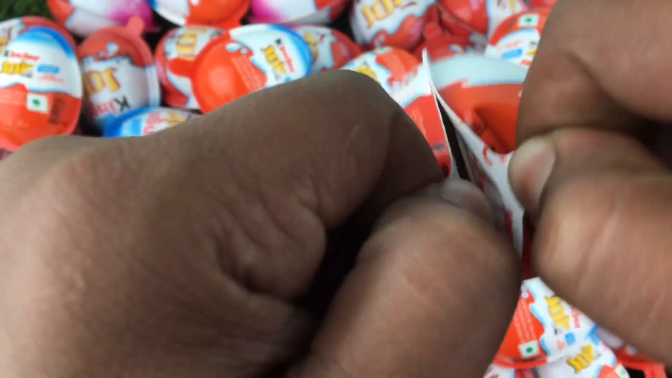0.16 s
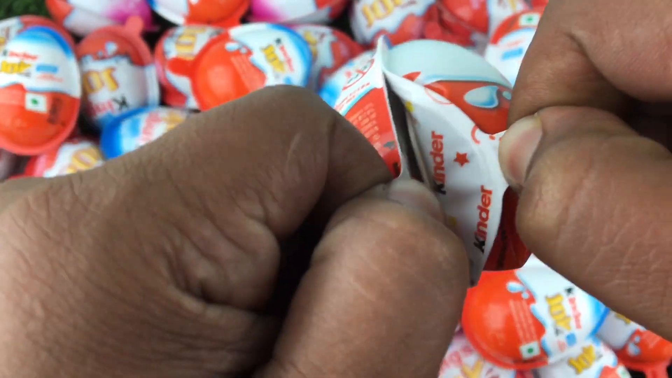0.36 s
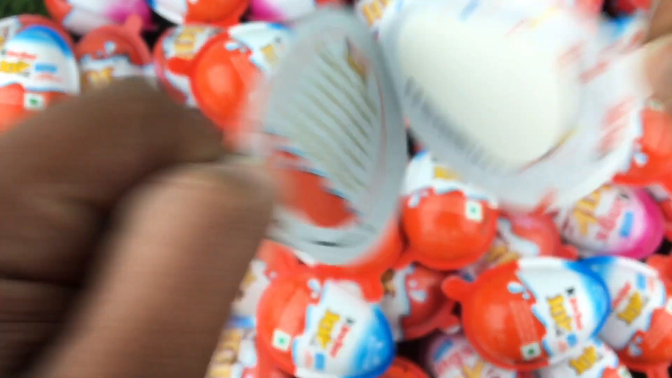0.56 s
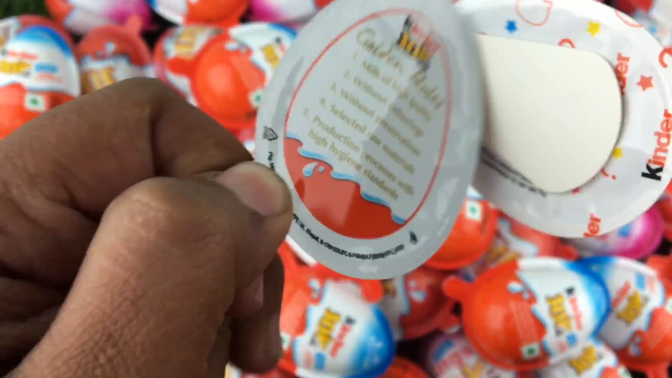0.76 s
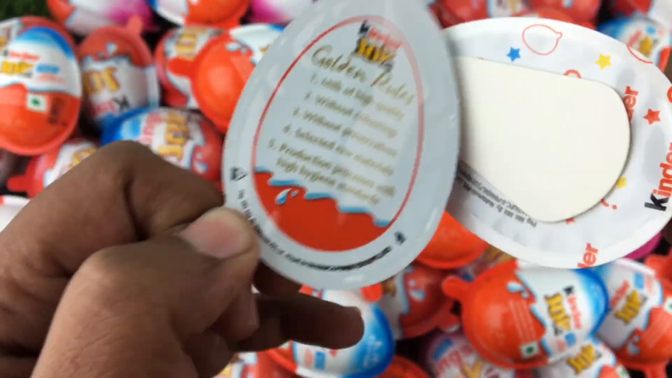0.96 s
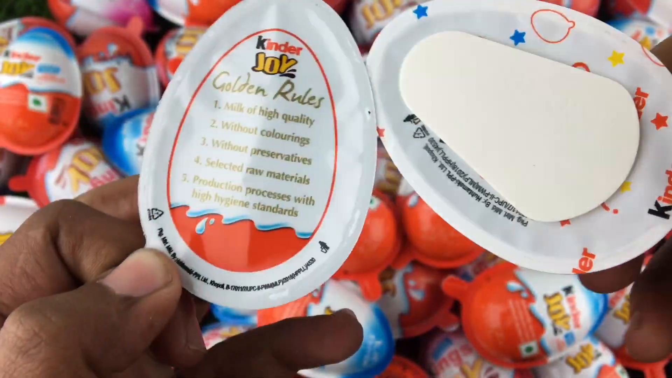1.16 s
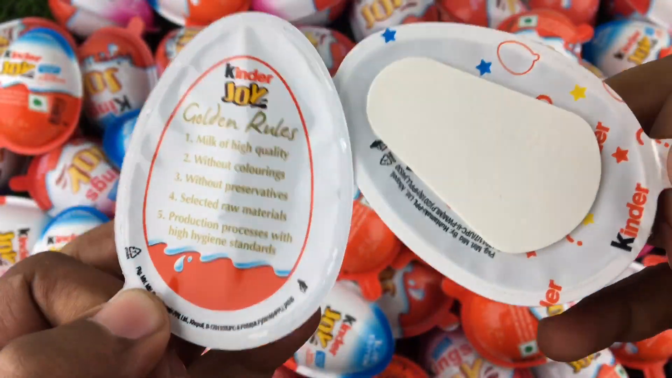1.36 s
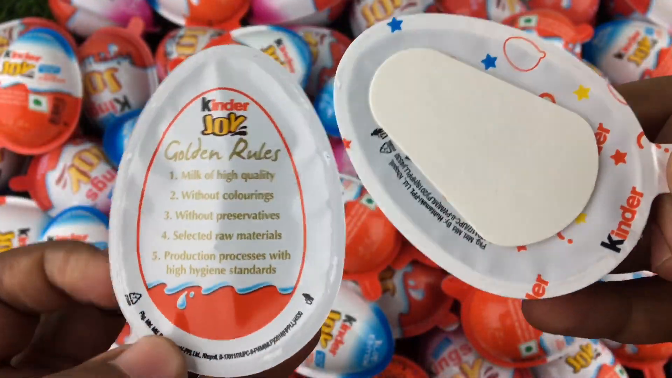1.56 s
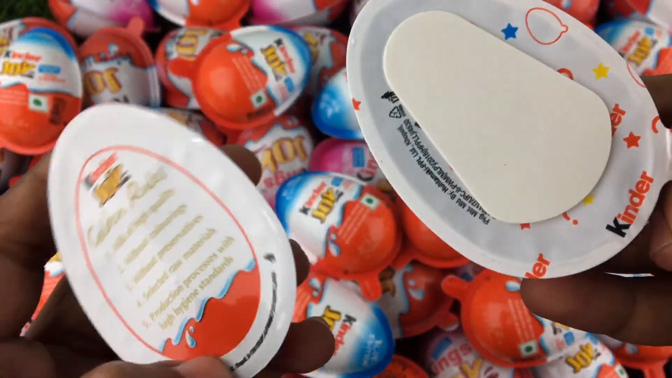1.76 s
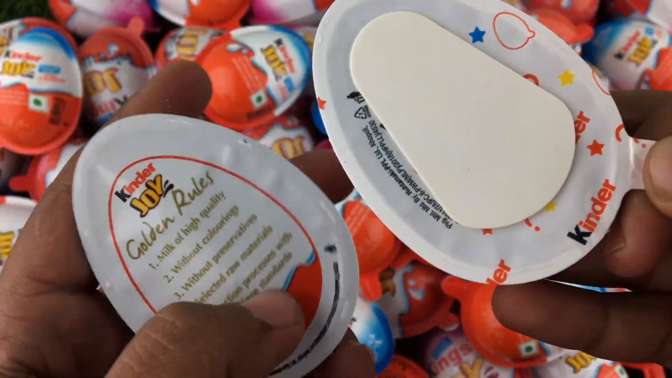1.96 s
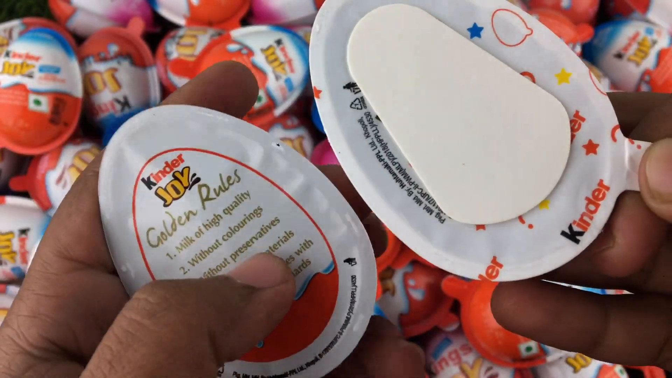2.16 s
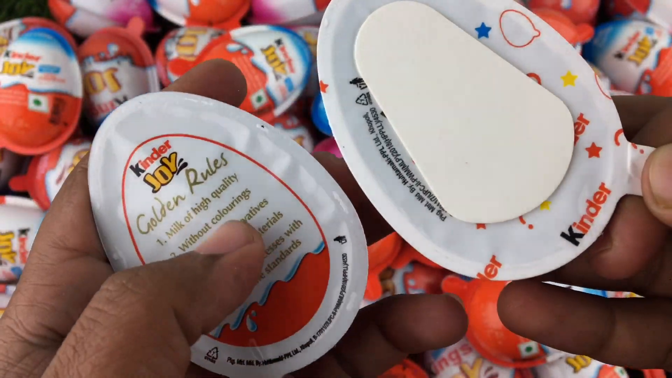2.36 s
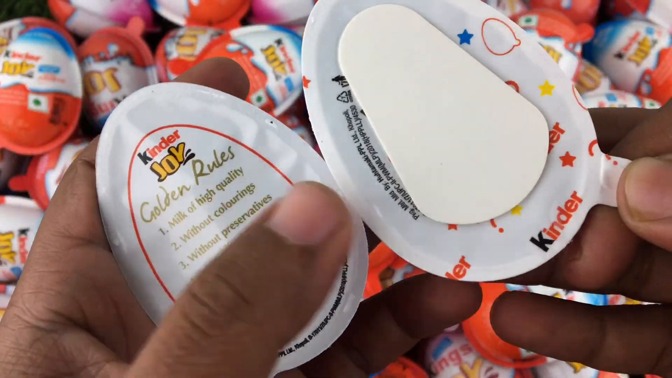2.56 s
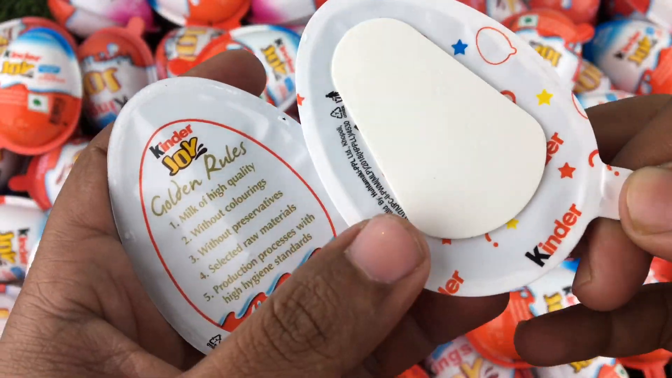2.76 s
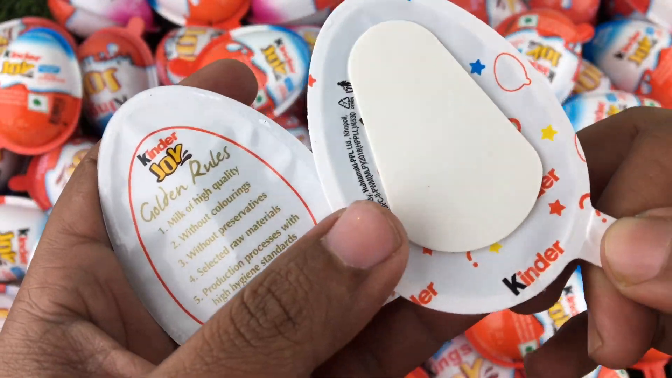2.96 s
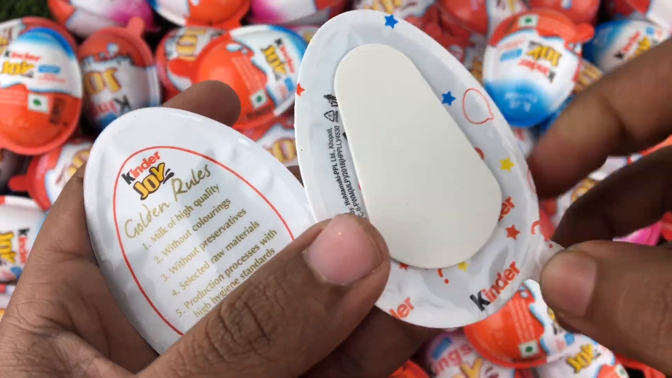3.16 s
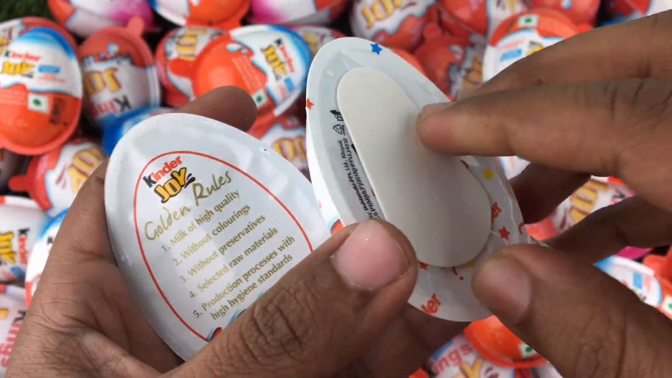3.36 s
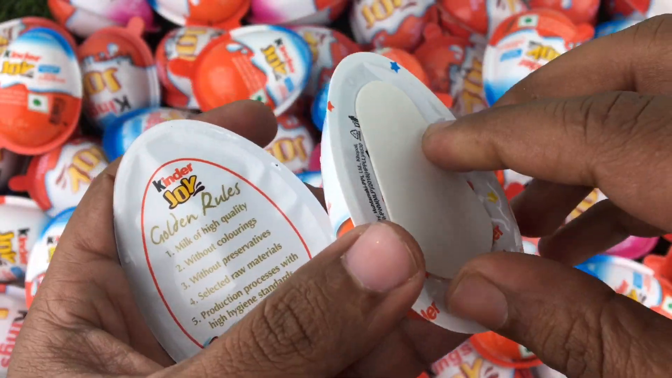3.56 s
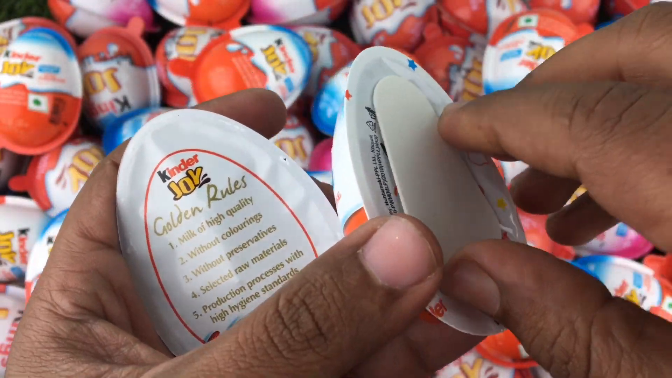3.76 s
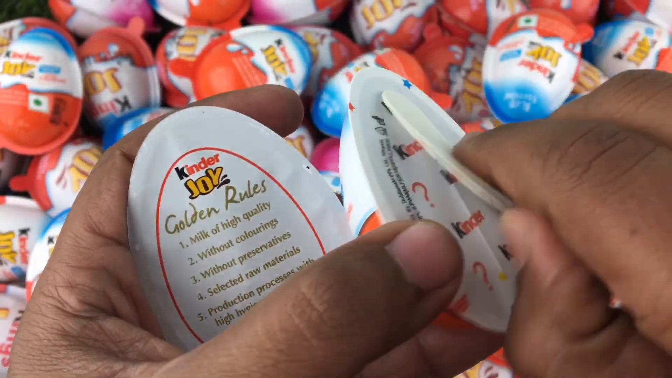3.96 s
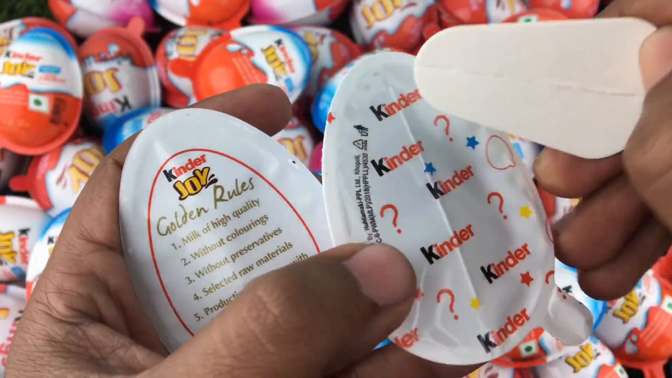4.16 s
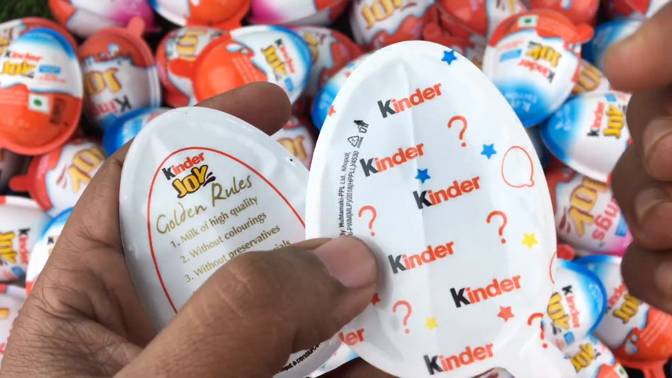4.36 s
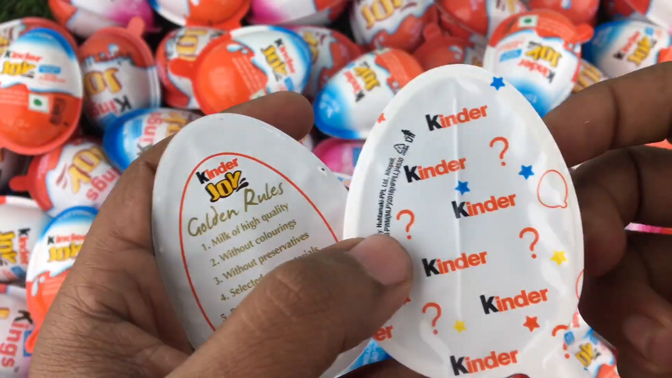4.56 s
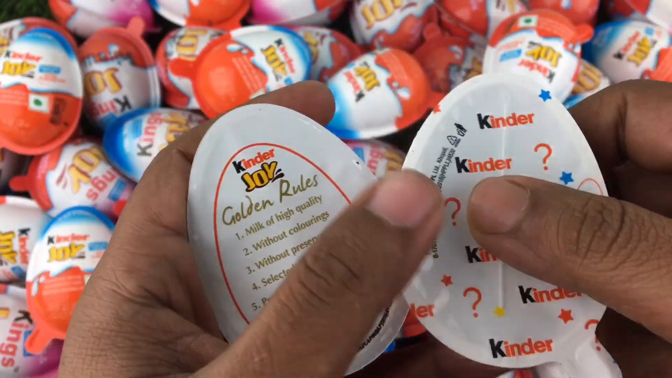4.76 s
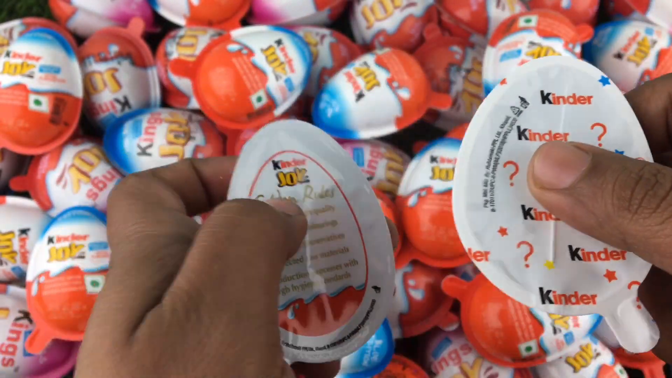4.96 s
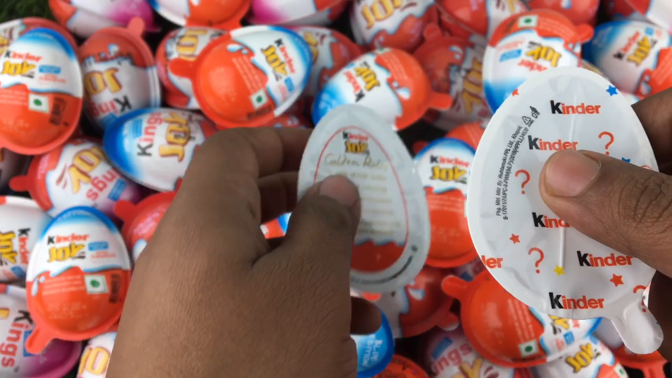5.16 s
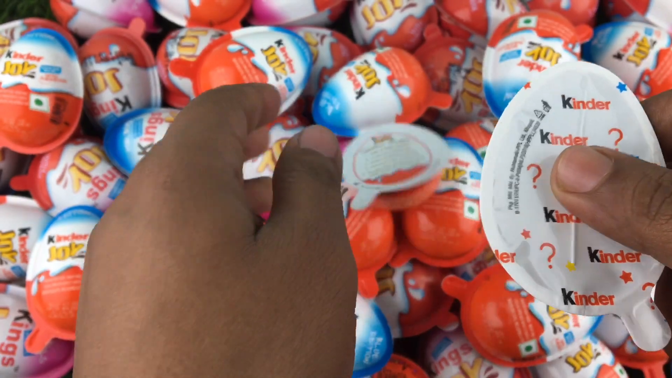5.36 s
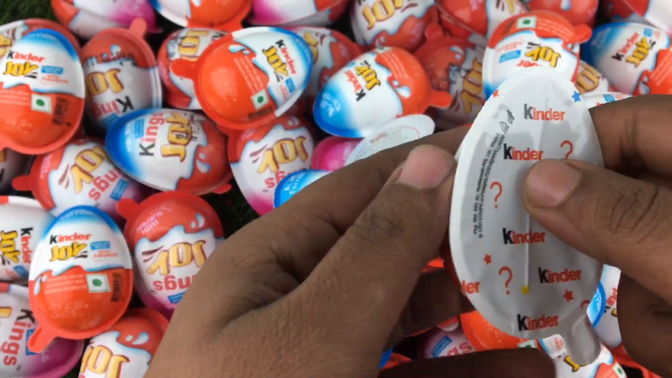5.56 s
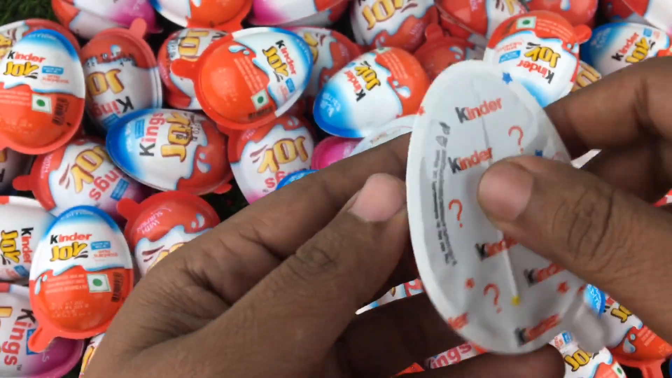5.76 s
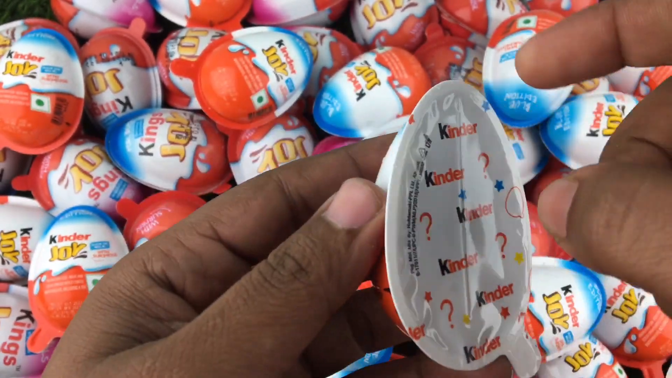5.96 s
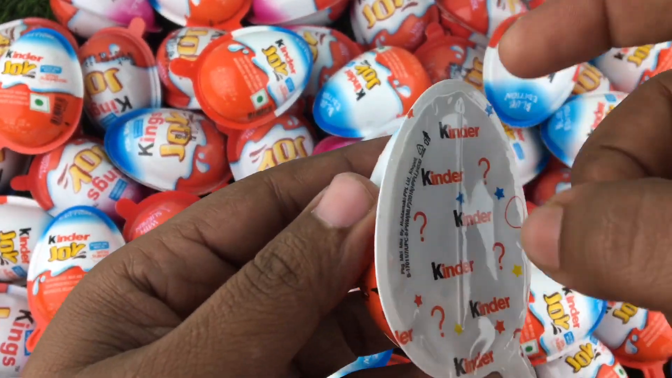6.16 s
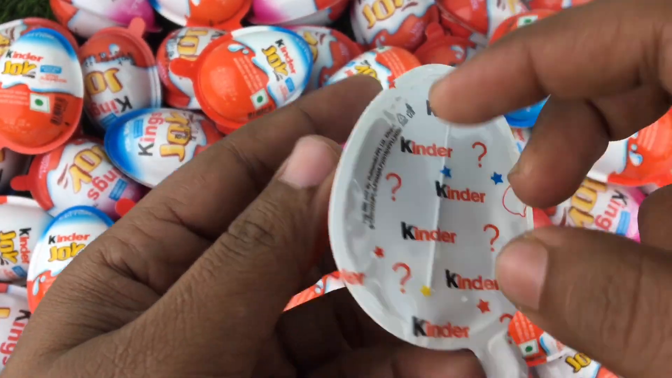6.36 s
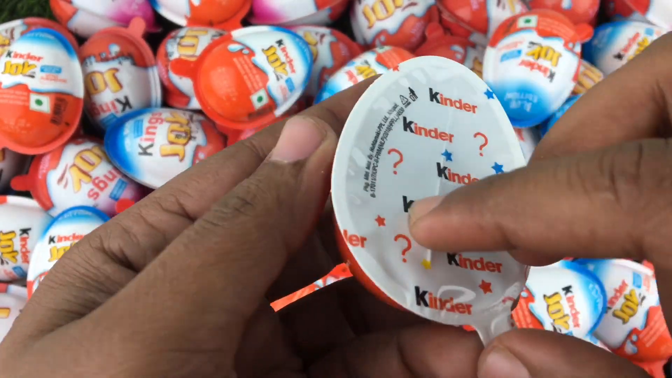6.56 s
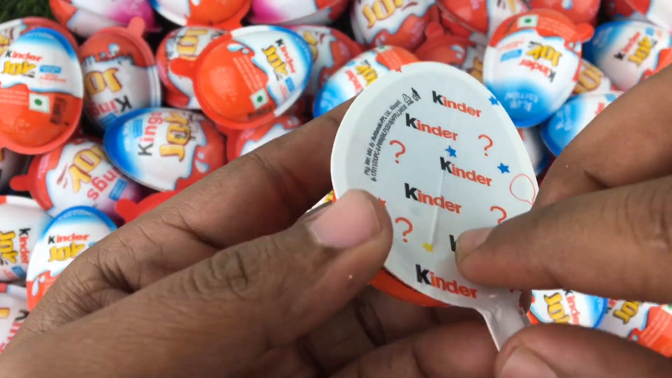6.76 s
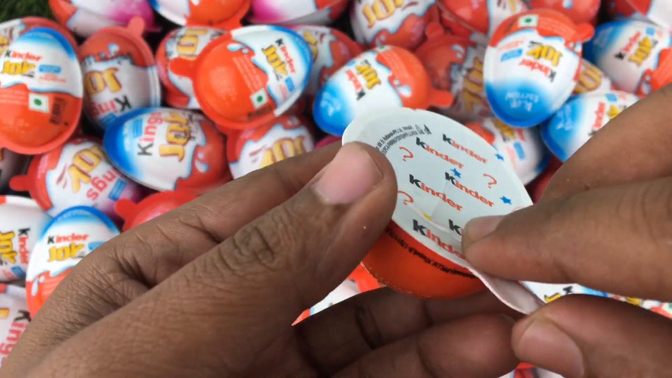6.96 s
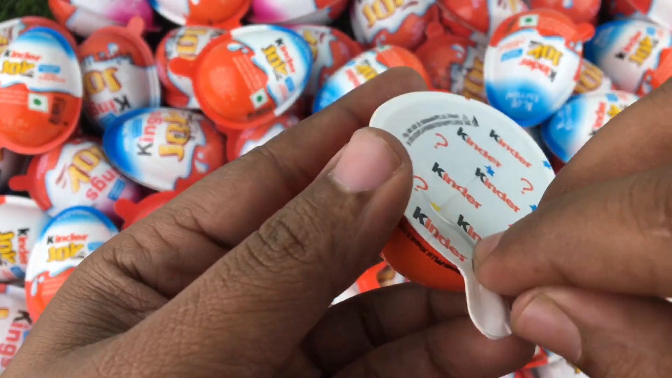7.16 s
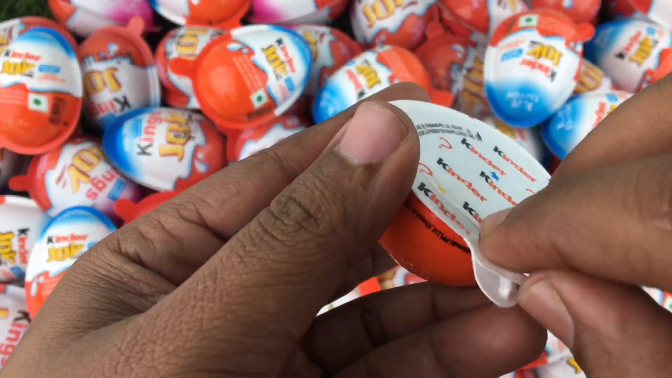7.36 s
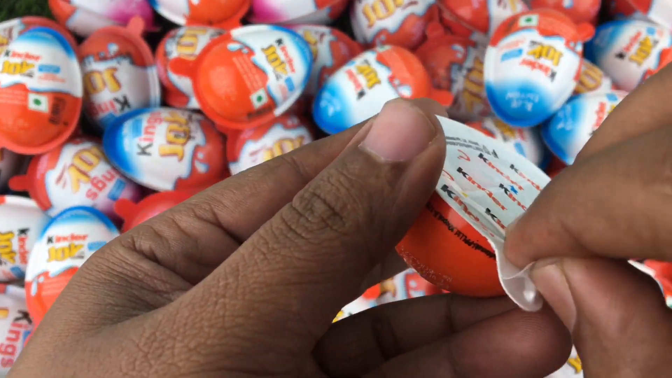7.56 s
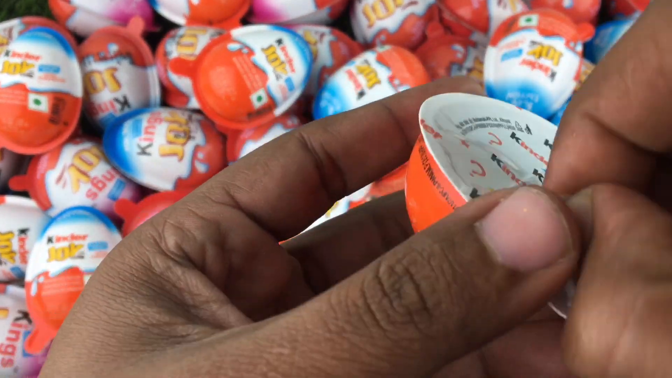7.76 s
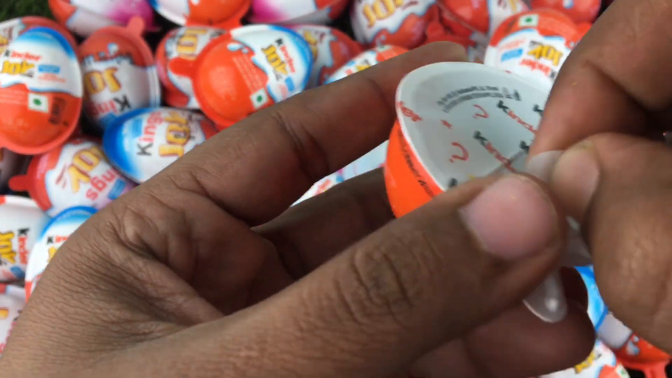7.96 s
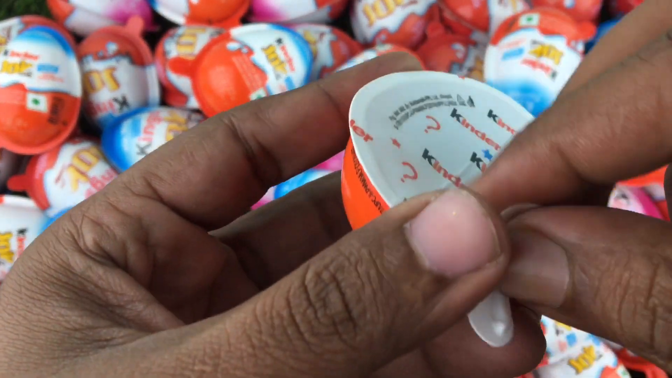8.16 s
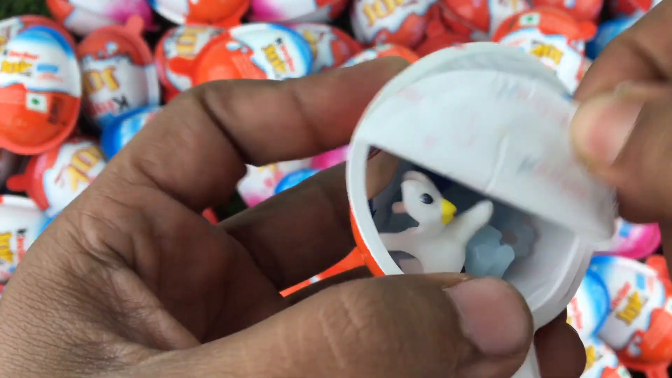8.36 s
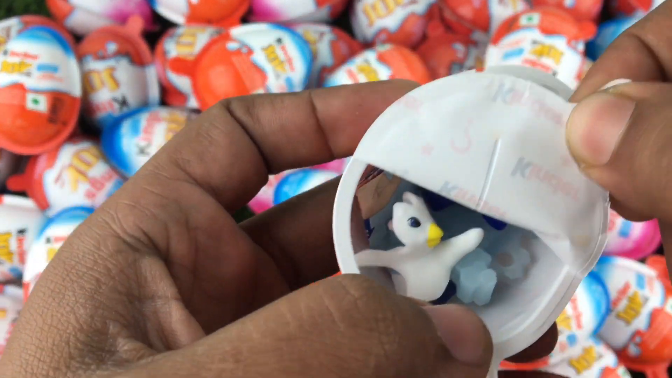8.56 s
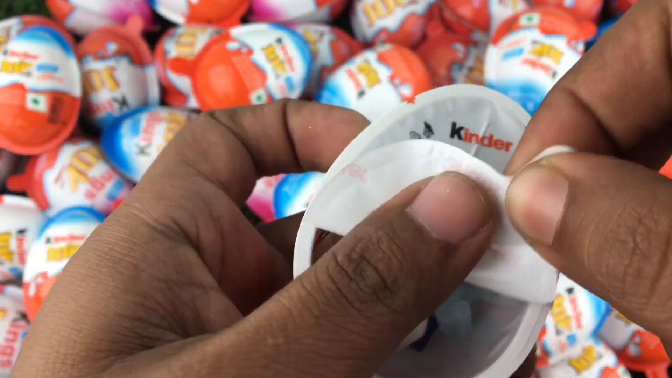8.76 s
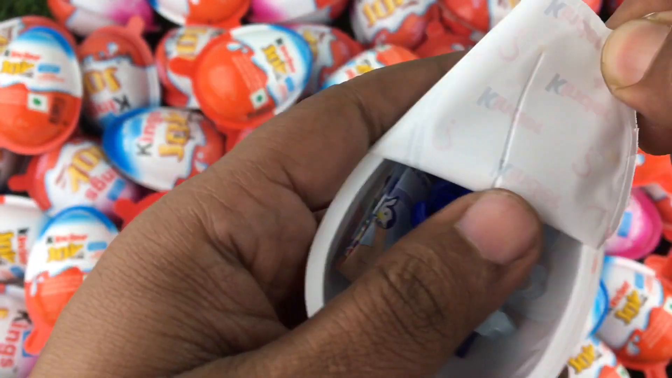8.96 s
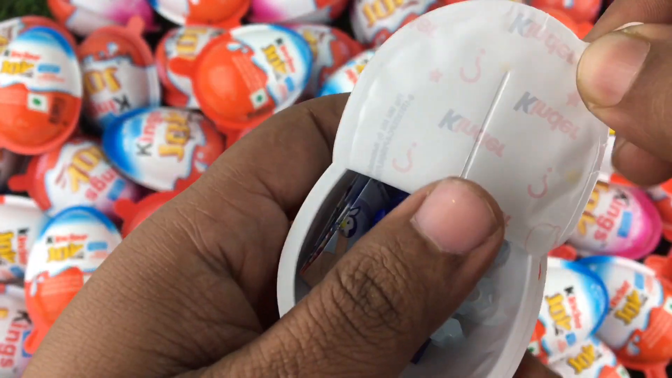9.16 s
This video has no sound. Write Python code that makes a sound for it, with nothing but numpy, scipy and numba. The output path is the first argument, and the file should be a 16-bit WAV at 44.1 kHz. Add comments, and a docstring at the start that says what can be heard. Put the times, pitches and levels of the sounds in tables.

```python
"""Sharp little cracks and a soft bump: fingers split a plastic egg, peel its foil seal and handle a flat spoon,
a hand's width from a phone microphone in a small quiet room. Each crease or glue spot that lets go is a short
ring, a knock and a crack; peeling is a dense run of them. Sliding skin hisses, bumps thud low, the held foil
ticks and rustles. The room answers, and the loudest peaks overload the phone."""
import sys
import numpy as np
from scipy import signal
from scipy.fft import rfft, irfft
from scipy.io import wavfile
from scipy.ndimage import uniform_filter1d
from numba import njit

SR = 44100
rng = np.random.default_rng(int(sys.argv[2]) if len(sys.argv) > 2 else 0)


def generate_wav(signal):
    """Clip the signal to [-1, 1] and save it as 16-bit WAV at the path in sys.argv[1]."""
    frames = np.transpose(np.atleast_2d(signal))
    scaled = np.clip(frames, -1, 1) * 32767
    pcm = np.round(scaled).astype(np.int16)
    wavfile.write(sys.argv[1], SR, pcm)


N = 407043

# Single creases letting go: start_s, level_db, pitch_hz, crack_db, knock_db (last two relative to level)
CREASES = [(0.062, -22, 1500, 2, -3.5), (0.082, -24.5, 1304, -16, 10.5), (0.1706, -16, 3250, -9, -1.5),
           (0.187, -13.5, 2220, -13.5, 4), (0.1932, -10.5, 1330, 4, 5.5), (.23, -21, 1160, 0, 0),
           (0.2363, -4, 2600, -11, 4.5), (0.2636, -15.5, 3700, 2, -10.5), (0.2804, -14, 3140, -4, 2.5),
           (0.306, -25, 6290, 3, -5.5), (.323, -10.5, 2920, 0.5, 1), (0.3582, 0.1, 3650, -1.5, -14.5),
           (0.4807, -17, 2380, 5.5, -5.5), (0.5153, -13.5, 8480, 2, -7), (.536, -15.5, 2280, 4, 5),
           (0.5529, 10, 3190, 5.5, 2.5), (0.588, -8.5, 1030, -3.5, -11.5), (0.6163, 0.5, 1950, 6, 3),
           (0.7158, -10, 1043, -12, -1.5), (.762, -10, 2260, -8, 11), (0.8246, -9.5, 3700, -14, -7),
           (0.862, -12, 3180, -7, 5.5), (1.018, -23.5, 1200, -16, 1), (1.0804, -28, 2690, -10, -1),
           (1.1063, -36.5, 2420, 3, 5), (1.15, -20.5, 4000, -1.5, 8), (1.318, -16.5, 2330, -17.5, -0.5),
           (1.3607, -10, 3240, -19, 6.5), (1.414, -36.5, 2435, -3, 14), (1.927, -38.5, 1496, -12, 0.5),
           (1.9714, -7.5, 6350, 0, -10.5), (1.986, -35, 2000, -15.5, 0), (2.122, -40.5, 2510, -11, -5),
           (2.328, -18, 2348, -11.5, 7.5), (2.9, -40.5, 792, -6.5, -1), (2.955, -45, 705, -10, -4.5),
           (3.161, -39.5, 704, -17.5, 0), (3.222, -44, 3480, -1, -12), (3.3683, -31.5, 1420, -8, 11.5),
           (3.6015, -33, 8010, 1, -2.5), (3.6128, -7.5, 3180, -6, -2), (3.847, -11.5, 2450, -26, 1.5),
           (3.8728, -8.5, 2530, -13, 0.5), (3.9008, -6, 1000, -17, -3.5), (3.9044, 2.5, 1120, -7.5, -4.5),
           (3.9126, -5, 1050, -20.5, 3.5), (3.923, -9.5, 1380, -30.5, -3), (3.9346, -20, 2498, 3.5, -4),
           (3.948, 5.5, 1390, -12, -7.5), (4.031, -12, 1400, -10.5, 5.5), (4.0482, -5.5, 1600, -8.5, -4),
           (4.066, -5, 1110, -17.5, 7), (4.1506, -14, 1130, -30.5, -5), (4.2453, -1.5, 1540, -8.5, 3),
           (4.5635, -16.5, 800, -13.5, -5), (4.634, -28.5, 1007, -6.5, -11.5),
           (4.73, -16.5, 1440, -11.5, 6.5), (4.8201, -13.5, 705, -26, -1.5), (4.954, -26.5, 2270, -2, 1.5),
           (5.241, -4, 1590, -40.5, -16.5), (5.324, -17.5, 2760, -5.5, 0), (5.397, -10.5, 5270, 0.5, 1),
           (5.5183, -20, 2100, -13.5, 3.5), (5.621, -11, 1400, -27.5, -14), (5.7763, -22.5, 1520, -6, 6.5),
           (5.7838, 1, 1680, -35, -8.5), (5.8422, 2, 1400, -27, -9.5), (5.855, -2, 1560, -32.5, -5.5),
           (6.034, -28, 2210, -5.5, -5), (6.0554, 5.5, 1550, 0.5, 3), (6.0855, 4.5, 1865, -15, -11.5),
           (6.2416, 6, 1690, -11.5, 2.5), (6.2451, 6, 1500, -4.5, 1.5), (6.277, -6, 1830, -23.5, -6.5),
           (6.2843, 2.5, 1680, -15.5, -4), (6.2885, -6, 1196, -23, -6), (7.002, -35.5, 2204, -2.5, 7),
           (7.0451, -21, 2040, 1, 5), (7.07, -24.5, 3800, 5, 4), (7.3952, -19, 1945, -14.5, 1.5),
           (7.6455, -23.5, 8000, -2, 2), (7.7354, -11, 4360, -12.5, 0), (7.7581, -11.5, 2070, 2, 14.5),
           (7.7693, -7, 1800, -27.5, 4.5), (7.7974, -4.5, 8650, 8, -1.5), (7.805, -6, 1330, -3, 1),
           (7.9049, -16, 3550, 8, 8), (8.0767, -7, 1160, -38, -8), (8.2727, -3.5, 1170, 4.5, 5),
           (8.2904, -8.5, 1300, -7.5, 6), (8.2979, 5.5, 1200, -11, -4.5), (8.309, -1, 6600, -13, 3.5),
           (8.3494, -10.5, 1930, -21, 6.5), (8.3676, -9.5, 1820, 11, 12), (8.37, 7.5, 1760, -4.5, -8),
           (8.4193, -8, 3400, 12.5, 3), (8.6378, -27.5, 2110, -9, 13.5), (8.657, -19, 1360, -19, -2.5),
           (8.729, -27, 2500, -3, 2), (8.7388, -10, 4280, 1.5, -0.5), (8.7482, -3.5, 4850, 4, 4),
           (8.778, -11, 1950, -19, -6), (8.793, 2, 1410, -4, 4), (8.8331, -7, 1950, -11.5, 4),
           (8.8418, -3.5, 5400, -20, 7), (8.8516, 1, 1770, -6.5, 3), (8.8761, 4.5, 1920, -26, -5),
           (8.89, -6.5, 840, -10, -2)]
# Runs of tearing glue: start_s, length_s, level_db, pitch_hz, crack_db (relative to level)
GLUE_TEARS = [(0.551, 0.029, -15.5, 2860, -8), (0.625, 0.016, -26.5, 1790, -12),
              (3.951, 0.036, -13, 1280, 1.5), (5.323, 0.02, -26, 2870, -3.5),
              (6.054, 0.014, -19.5, 2300, -13), (6.085, 0.011, -19.5, 1490, -33),
              (7.794, 0.016, -18, 1300, -0.5), (8.299, 0.03, -14, 1160, -1), (8.366, 0.016, -15, 1900, -10),
              (8.416, 0.0071, -16.5, 1800, -17), (8.839, 0.034, -13, 1670, -13)]
# Skin sliding on foil or the spoon: start_s, length_s, level_db, pitch_hz
SKIN_SLIDES = [(1.24, 0.044, -59.5, 2240), (1.524, 0.029, -53, 3970), (1.79, 0.022, -50, 4180),
               (1.821, 0.024, -51.5, 4500), (2.677, 0.0094, -54, 905), (2.744, 0.023, -54.5, 2560),
               (2.78, 0.02, -58, 2180), (2.817, 0.066, -61.5, 2170), (3.093, 0.036, -53.5, 3540),
               (3.343, 0.047, -50.5, 1460), (3.423, 0.037, -54.5, 2240), (4.281, 0.07, -49.5, 1600),
               (4.745, .018, -40.5, 1070), (4.943, 0.023, -51.5, 3100), (5.361, 0.075, -44, 5300),
               (5.65, 0.098, -55, 3730), (6.6, 0.073, -45, 1430), (6.794, 0.059, -58, 1325),
               (7.023, 0.035, -47, 1980), (7.62, 0.026, -46.5, 755), (7.705, 0.033, -53, 1480),
               (8.004, 0.039, -39, 1055), (8.112, 0.036, -46.5, 1120), (9.08, 0.022, -33, 1870)]
# The shell or a hand bumping: start_s, level_db, pitch_hz, t60_s
BUMPS = [(0.061, -31, 370, 0.035), (0.863, -33.5, 296, 0.083), (0.54, -38, 61, 0.22),
         (.616, -19.5, 96, 0.061), (5.66, -25, 630, 0.046), (1.15, -30.5, 320, 0.055),
         (1.41, -38.5, 270, 0.1), (5.29, -31.5, 51, 0.64), (6.37, -34.5, 130, 0.22),
         (7.75, -35.5, 324, 0.19), (8.302, -33, 150, 0.21), (8.32, -24.5, 290, 0.079),
         (8.85, -26.5, 107, 0.14), (9.086, -35, 67, 0.17), (9.083, -32.5, 430, 0.13)]
# How firmly the fingers work the foil: time_s, level_db
FOIL_GRIP = [(0, -40), (1, -45), (1.45, -38.5), (1.7, -50.5), (2.6, -54.5), (3.7, -50), (4.45, -35),
             (5.15, -39.5), (5.7, -45.5), (6.5, -40.5), (6.95, -46.5), (7.3, -56.5), (7.7, -45.5),
             (8.65, -29), (9.23, -35)]
# Reverberation off the walls, band by band: centre_hz, t60_s, level_db
WALL_BANDS = [(249, 1, -6.5), (695, 0.34, -12.5), (1574, 0.72, -14.5), (3630, 0.55, -19),
              (7500, 0.4, -20.5), (13510, 0.37, -24.5)]
# Spectrum of room tone and microphone hiss: frequency_hz, relative_db
TONE_SPECTRUM = [(25, -8), (60, 3.5), (252, -11.5), (584, -13), (878, -18.5), (3320, -24),
                 (13600, -29.5), (15200, -33), (16500, -52)]


def snaps(start_s, size, pitch_hz, crack_db, knock_db, ring_cycles=4.9, damping=0.3):
    """Each release rings for a few cycles, knocks the shell and throws a crack of treble."""
    onset = (start_s * SR).astype(np.int64)
    # The more the shell takes up, the shorter the ring.
    t60_s = (0.0023 + ring_cycles / pitch_hz) * undb(-damping * knock_db)
    ring = rings(N, onset, size, pitch_hz, t60_s, rise=decay_factor(0.65 / pitch_hz))
    ring = signal.sosfilt(signal.butter(4, 430, "highpass", fs=SR, output="sos"), ring)
    knock = burst(onset, size * undb(knock_db), fast_s=0.00054, slow_s=0.0037, slow_db=-15.0)
    crack = burst(onset, size * undb(crack_db), fast_s=0.0004, slow_s=0.0024, slow_db=-15.5)
    return ring + band(knock, 630, 3550) + band(crack, 3600, 11500)


@njit
def rings(n, onset, size, pitch_hz, t60_s, rise):
    """Decaying sines that build up over the contact time, each followed down to -60 dB."""
    out = np.zeros(n)
    for k in range(len(onset)):
        pole = np.exp(2j * np.pi * pitch_hz[k] / SR - np.log(1000) / (t60_s[k] * SR))
        phasor, lag = size[k] + 0j, 1.
        for i in range(onset[k], min(n, onset[k] + int(t60_s[k] * SR))):
            phasor *= pole
            lag *= rise[k]
            out[i] += phasor.imag * (1 - lag)
    return out


def burst(onset, size, fast_s, slow_s, slow_db, click_db=0.5):
    """A break: a flat click, then white noise that fades fast, then slower."""
    clicks = np.bincount(onset, size, N)
    fast = signal.lfilter([1], [1, -decay_factor(fast_s)], clicks)
    slow = undb(slow_db) * signal.lfilter([1], [1, -decay_factor(slow_s)], clicks)
    # The break takes a moment, which rounds the attack.
    envelope = signal.lfilter([1 - decay_factor(0.00024)], [1, -decay_factor(0.00019)], fast + slow)
    return envelope * rng.standard_normal(N) + undb(click_db) * clicks


def creases():
    """Creases let go one by one. Rows: start_s, size, pitch_hz, crack_db, knock_db."""
    return [(start_s, undb(level_db), *timbre) for start_s, level_db, *timbre in CREASES]


def peel(spots_per_s=1700, scatter_db=5.5):
    """Glue spots give way at random, a few much louder. Rows: start_s, size, pitch_hz, crack_db."""
    rows = []
    for start_s, length_s, level_db, pitch_hz, crack_db in GLUE_TEARS:
        count = int(length_s * spots_per_s) + 2
        when, strength, detune = rng.random((count, 3)).T
        size = undb(-scatter_db * np.log(1 - strength))
        spot_hz = pitch_hz * 2 ** (1.2 * detune - .6)
        rows += zip(start_s + length_s * when, undb(level_db) * unit(size), spot_hz, [crack_db] * count)
    return rows


def skin_slides(grain_db=3.5, grain_s=.004, hiss_db=-7):
    """Skin catches and slips on the sheet: grainy friction noise, part ringing the sheet, part hiss."""
    out = np.zeros(N)
    grain = int(grain_s * SR)
    for start_s, length_s, level_db, pitch_hz in SKIN_SLIDES:
        onset, n = int((start_s - .005) * SR), int((length_s + 0.0086) * SR)
        friction = rng.standard_normal(n) * undb(grain_db * random_steps(n, grain))
        sheet = unit(band(friction, pitch_hz / 1.8, pitch_hz * 2.05))
        hiss = undb(hiss_db) * unit(band(friction, 4000, 12000))
        out[onset:onset + n] += undb(level_db) * unit(sheet + hiss) * signal.windows.tukey(n, .5)
    return out


def bumps(attack_s=0.00054, settle_samples=4000):
    """The shell or a hand bumps: a thud of low noise around the pitch that dies away."""
    out = np.zeros(N)
    for start_s, level_db, pitch_hz, t60_s in BUMPS:
        onset = int(start_s * SR)
        t = np.arange(min(int(t60_s * SR), N - onset)) / SR
        noise = unit(band(rng.standard_normal(len(t) + settle_samples), pitch_hz / 2, pitch_hz * 2))
        envelope = undb(level_db - 60 * t / t60_s) * np.clip(t / attack_s, 0, 1)
        out[onset:onset + len(t)] += envelope * noise[settle_samples:]
    return out


def foil_ticks(count=500, spread_db=18, crack_db=-7):
    """Restless fingers tick the foil at random, louder under a firmer grip. Rows as in peel()."""
    when, softness, pitch = rng.random((count, 3)).T
    start_s = when * (N / SR - .01)
    size = undb(np.interp(start_s, *np.transpose(FOIL_GRIP)) - spread_db * softness)
    pitch_hz = 600 * 2 ** (3.2 * pitch)
    return list(zip(start_s, size, pitch_hz, [crack_db] * count))


def foil_rustle(offset_db=-30, patchy_db=6.5, patch_s=.02):
    """The held foil rustles softly in patches, as firmly as it is gripped."""
    patch = int(patch_s * SR)
    patches = uniform_filter1d(random_steps(N, patch), patch)
    grip_db = np.interp(np.arange(N) / SR, *np.transpose(FOIL_GRIP))
    noise = unit(band(rng.standard_normal(N), 1000, 5700))
    return undb(grip_db + offset_db + patchy_db * patches) * noise


def room(direct, near_t60_s=0.056, near_db=-9):
    """Direct sound, echoes off the table and nearby shells, then walls, each band at its own pace."""
    t = np.arange(int(.75 * SR)) / SR
    echo = unit(rng.standard_normal(len(t)) * undb(-60 * t / near_t60_s)) * undb(near_db) * (t > .002)
    build_up = np.clip(t / 0.011, 0, 1)
    for centre_hz, t60_s, level_db in WALL_BANDS:
        noise = band(rng.standard_normal(len(t)), centre_hz / 1.5, centre_hz * 1.57)
        echo += noise * unit(undb(-60 * t / t60_s)) * undb(level_db) * build_up
    return direct + signal.fftconvolve(direct, echo / np.sqrt(len(t)))[:N]


def room_tone(tone_db=-64.5, rumble_db=-72.0):
    """Room tone and microphone hiss, over a distant rumble."""
    bin_hz = np.maximum(np.fft.rfftfreq(N, 1 / SR), 1)
    frequency_hz, relative_db = np.transpose(TONE_SPECTRUM)
    spectrum = undb(np.interp(np.log(bin_hz), np.log(frequency_hz), relative_db))
    tone = unit(irfft(rfft(rng.standard_normal(N)) * spectrum, N))
    rumble = unit(band(band(rng.standard_normal(N), 46, 51), 46, 51))
    return tone * undb(tone_db) + rumble * undb(rumble_db)


def undb(db):
    """Decibels to amplitude."""
    return 10 ** (np.asarray(db) / 20)


def unit(x):
    """Scale to an RMS of one."""
    return x / np.sqrt(np.mean(x ** 2))


def band(x, lo_hz, hi_hz):
    """Gentle band-pass filter."""
    edges_hz = [lo_hz, min(hi_hz, SR / 2.2)]
    return signal.sosfilt(signal.butter(2, edges_hz, "bandpass", fs=SR, output="sos"), x)


def decay_factor(time_constant_s):
    """Per-sample factor of an exponential decay."""
    return np.exp(-1 / (time_constant_s * SR))


def random_steps(n, hold):
    """n samples of Gaussian values, each held for `hold` samples."""
    return np.repeat(rng.standard_normal(n // hold + 1), hold)[:n]


def scene(small_knock_db=0.1):
    """Egg, foil and spoon close to one microphone, the quiet room behind them."""
    small_snaps = [(*row, small_knock_db) for row in peel() + foil_ticks()]
    crackle = snaps(*np.transpose(creases() + small_snaps))
    handling = crackle + skin_slides() + bumps() + foil_rustle()
    return (room(handling) + room_tone())[None]


def record(dry, port_hz=10500, ceiling=.8, bass_cut_hz=36, top_hz=16300):
    """The microphone port dips the treble; the phone rounds off peaks and cuts deep bass and the top."""
    port = dry - .5 * signal.lfilter(*signal.iirpeak(port_hz, 10., SR), dry)
    rounded = port / (1 + np.abs(port / ceiling) ** 4) ** .25
    thinned = signal.sosfilt(signal.butter(3, bass_cut_hz, "highpass", fs=SR, output="sos"), rounded)
    return signal.sosfilt(signal.ellip(12, .2, 120, top_hz, fs=SR, output="sos"), thinned)


dry = scene()
out = record(dry)
generate_wav(out)
```